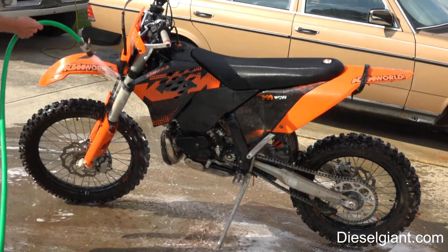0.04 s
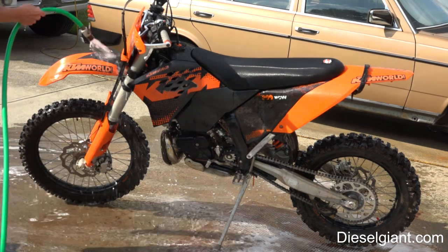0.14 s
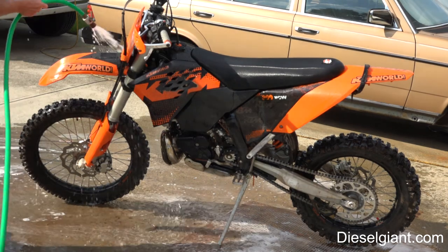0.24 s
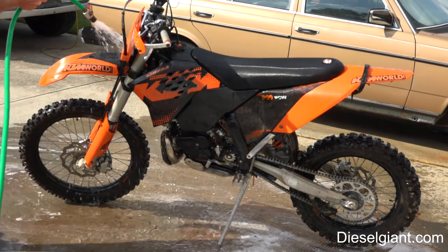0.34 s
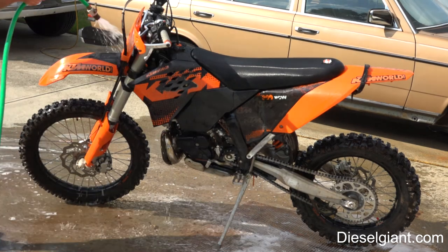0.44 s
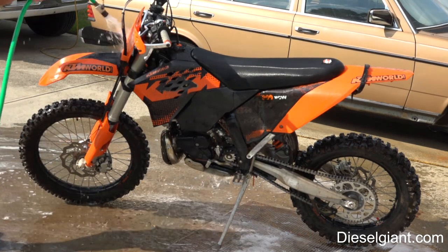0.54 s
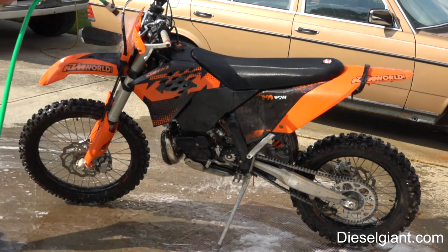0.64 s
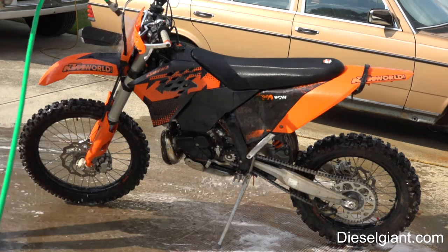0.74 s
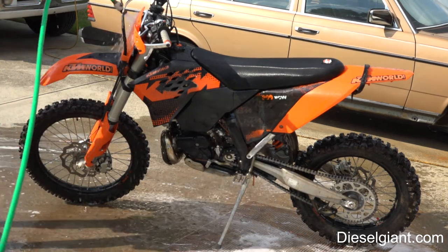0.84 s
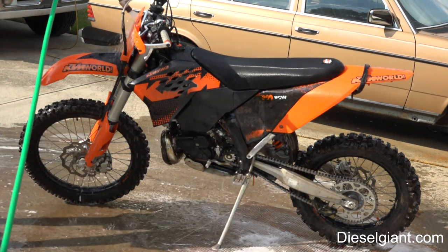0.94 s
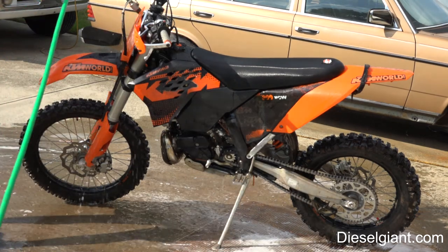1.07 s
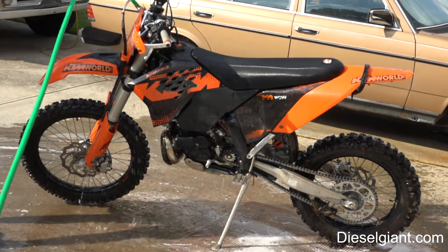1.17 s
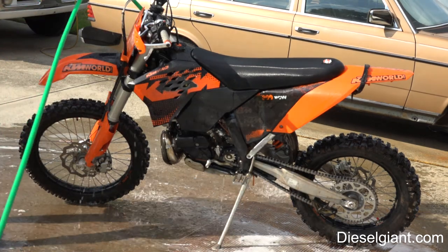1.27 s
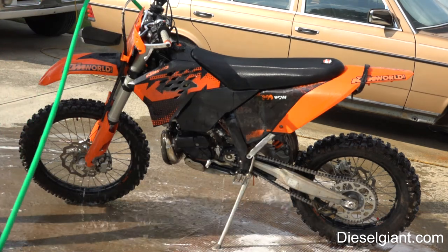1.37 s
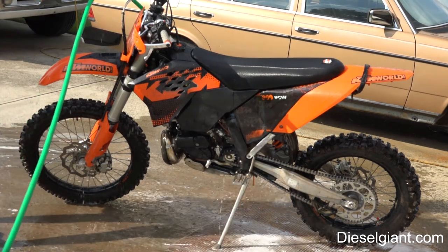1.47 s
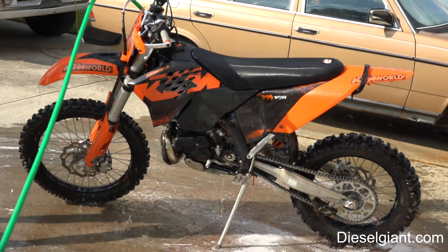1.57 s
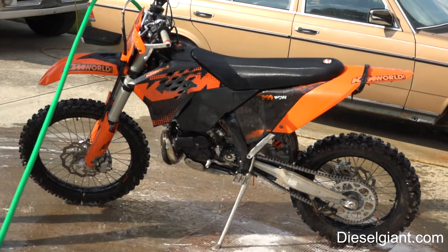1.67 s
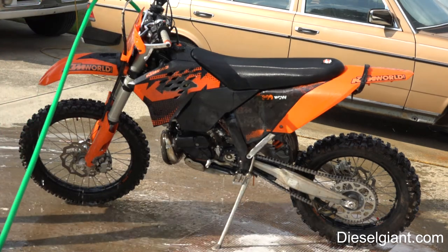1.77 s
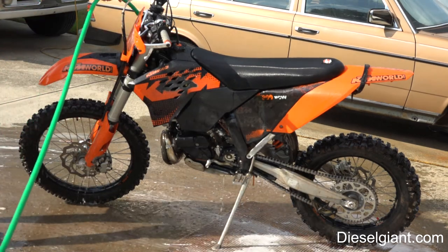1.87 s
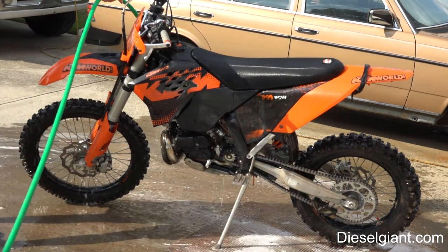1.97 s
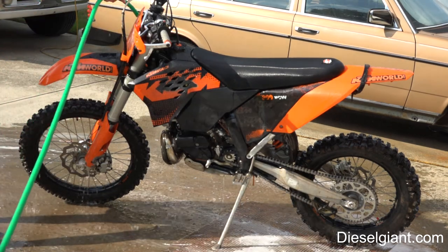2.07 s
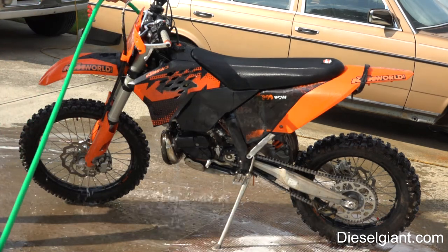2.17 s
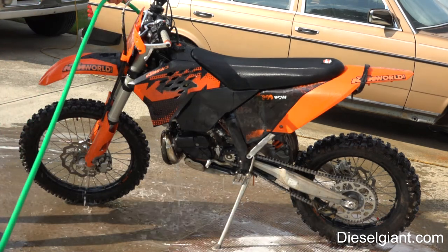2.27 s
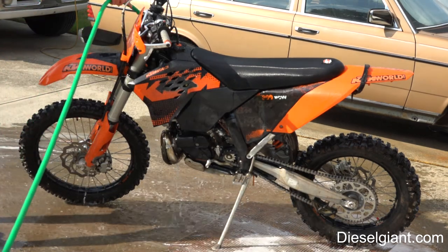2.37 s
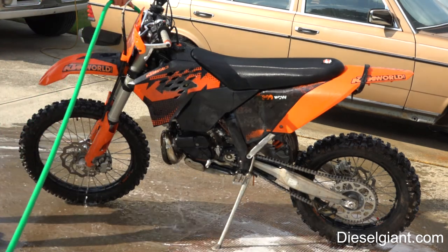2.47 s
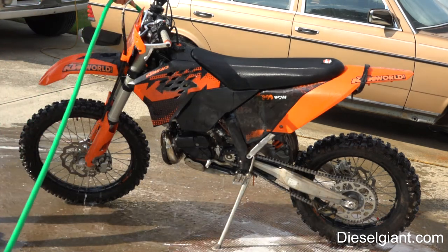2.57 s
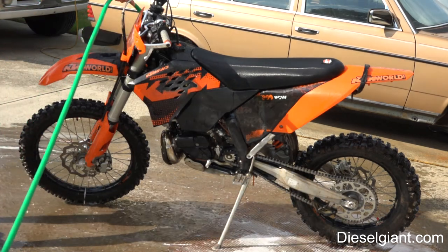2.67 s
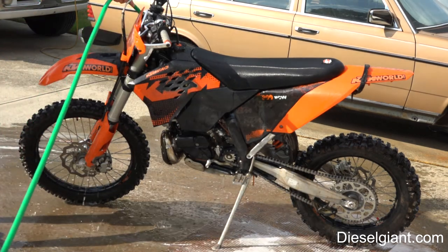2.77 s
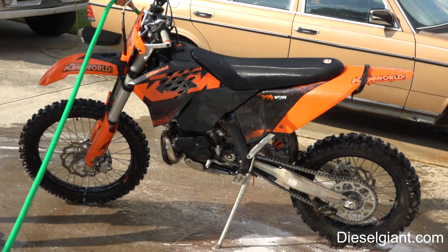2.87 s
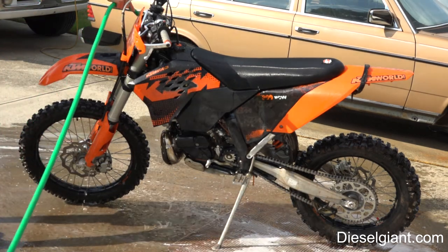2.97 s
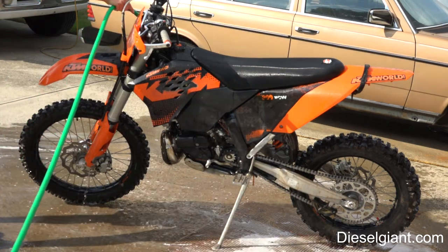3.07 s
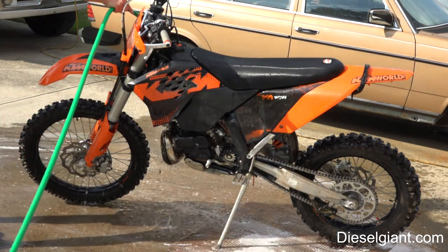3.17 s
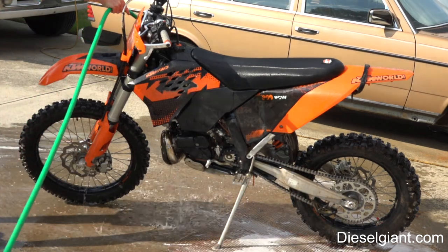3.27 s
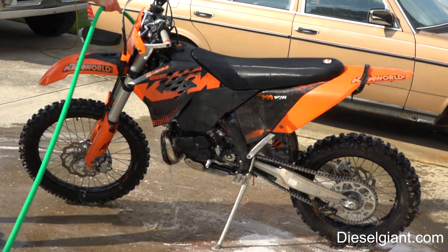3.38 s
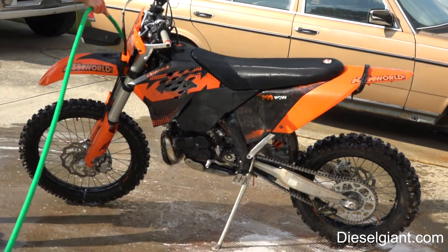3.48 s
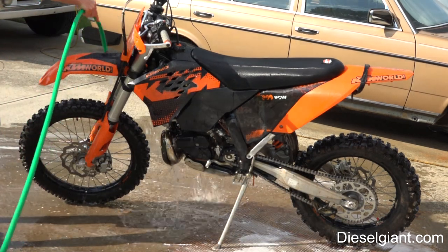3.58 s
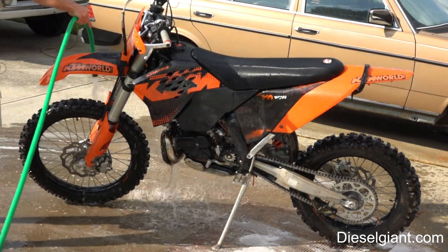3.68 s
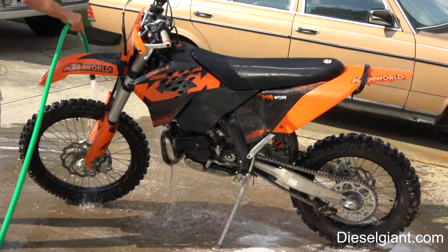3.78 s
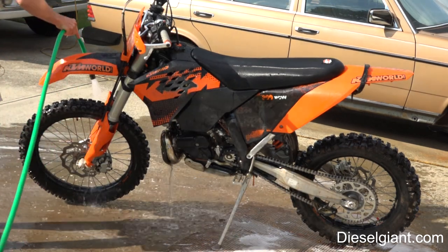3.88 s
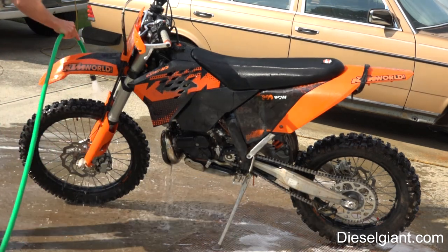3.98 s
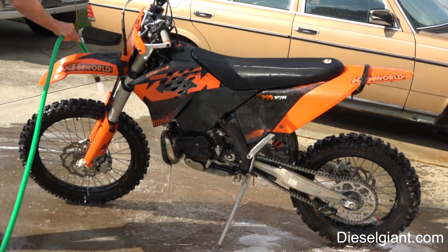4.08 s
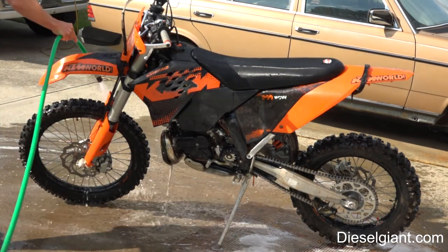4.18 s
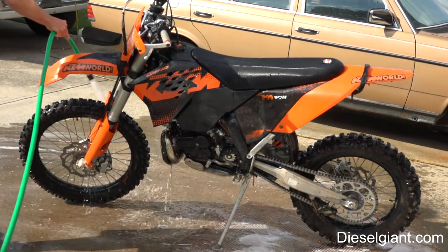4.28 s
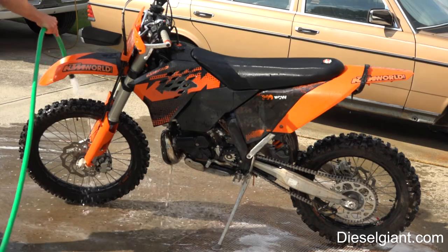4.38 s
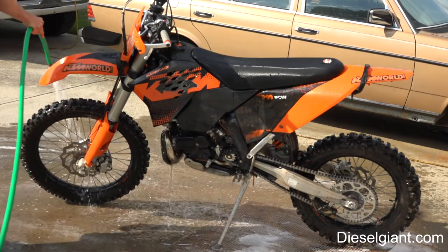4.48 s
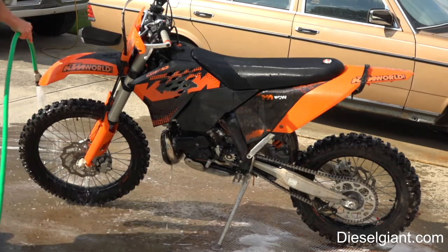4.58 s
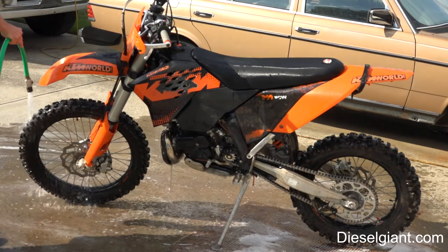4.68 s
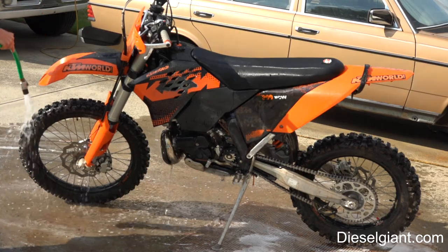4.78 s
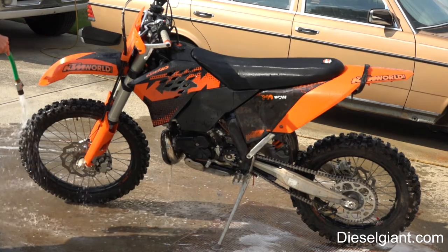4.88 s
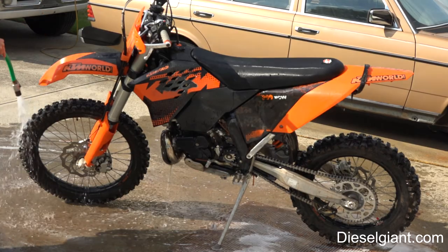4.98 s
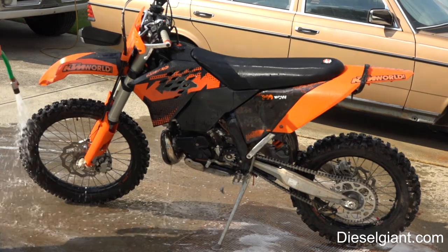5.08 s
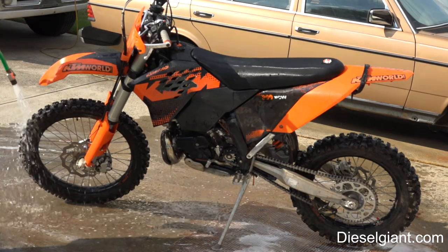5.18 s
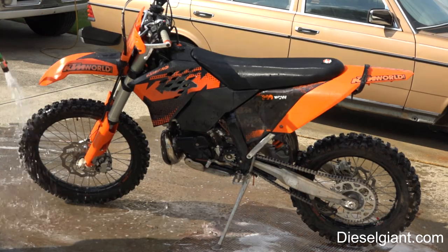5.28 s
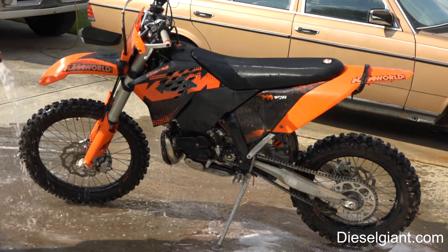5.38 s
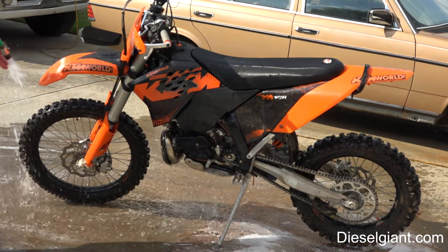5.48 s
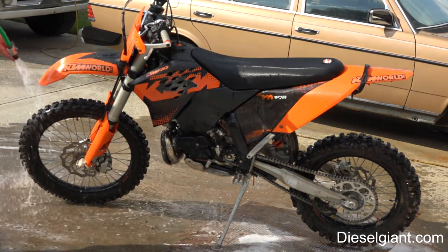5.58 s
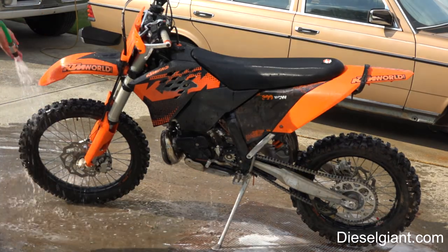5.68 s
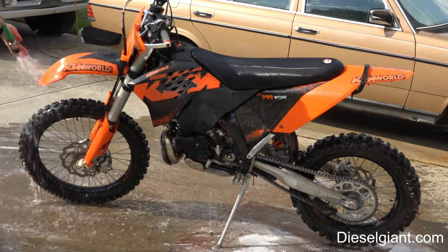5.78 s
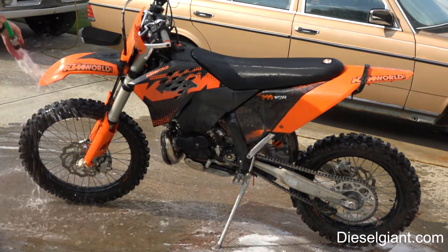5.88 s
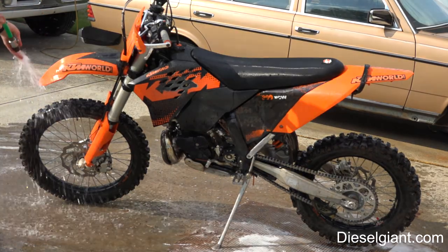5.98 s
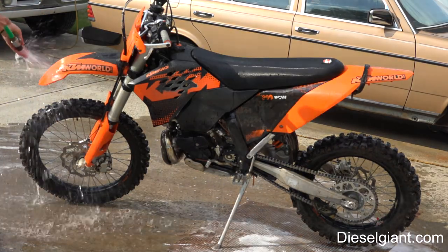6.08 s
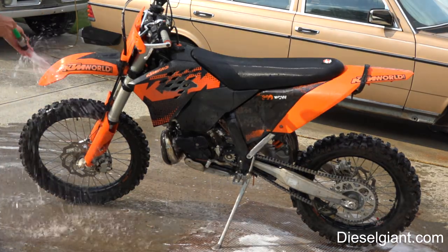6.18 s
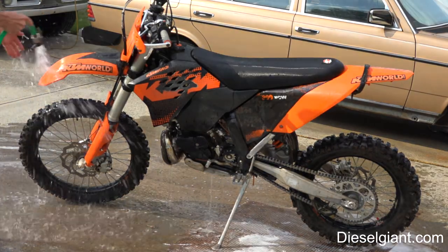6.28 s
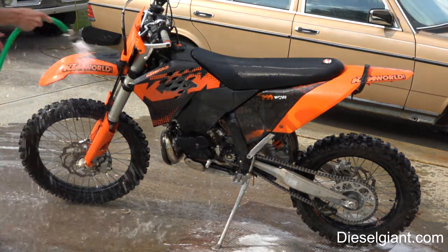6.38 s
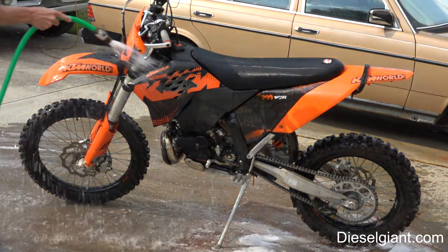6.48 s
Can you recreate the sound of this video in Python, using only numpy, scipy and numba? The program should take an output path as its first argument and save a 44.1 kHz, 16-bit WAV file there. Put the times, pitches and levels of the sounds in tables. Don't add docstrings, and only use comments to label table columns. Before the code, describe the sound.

Water from a garden hose fizzes over a motorbike on wet concrete, a few metres from a small microphone outdoors. From 0 to 1 second the jet is strong and bright, with thick spatter, smacking drops and hollow drumming on plastic, loudest around 0.6 to 0.9. A wind puff bumps the microphone near 1 second as the spray weakens. Until about 3.5 it stays thinner, a flickering hiss with scattered drops, faint singing tones and a hard knock near 2.6. Around 3.6 to 4.3 it bursts and revives, crackling sharply. From 4.6 to 5.3 fine spatter and crisp droplet cracks patter with a short echo; heavier drops and hollow ringing follow from 5.5. The jet surges near 6.2, then eases by 6.5. Quiet bubbling run-off, low wind and barely audible distant hums lie underneath.

```python
import sys
import numpy as np
from scipy import signal
from scipy.fft import rfft, irfft, next_fast_len
from scipy.io import wavfile
from scipy.ndimage import uniform_filter1d, map_coordinates
from numba import njit

SR = 44100
rng = np.random.default_rng(int(sys.argv[2]) if len(sys.argv) > 2 else 0)


def transcribe(signal):
    frames = np.atleast_2d(signal).T
    limited = np.clip(frames, -1, 1)
    pcm = np.round(limited * 32767).astype(np.int16)
    wavfile.write(sys.argv[1], SR, pcm)


def boost(x):
    u = np.asarray(x, float) / 20
    return 10 ** u


N = 288414

# time in seconds, strength in dB, froth over fizz in dB,
# froth pitch in Hz, fizz pitch in Hz.
JET = [(0.0, -25, 2, 3360, 4100), (0.18, -22.5, -1, 3530, 4280), (0.86, -24.5, -4, 2600, 4230),
       (0.95, -23.5, 0.5, 3270, 3800), (1.15, -32, -2, 3240, 4040), (1.38, -27.5, -8, 3190, 4000),
       (1.78, -32.5, 0, 2740, 4200), (1.95, -29.5, -9, 2970, 4130), (2.66, -31.5, -1, 2710, 4240),
       (3.75, -28.5, -3, 3200, 4080), (3.9, -24.5, -9, 3050, 4150), (4.3, -31, 2, 3070, 4360),
       (4.52, -29, -2, 3130, 3740), (4.66, -27, 3, 3310, 3930), (5.99, -24, 2, 2940, 4760),
       (6.17, -18, -3, 2700, 4480), (6.34, -22, 6.5, 3130, 4350), (6.54, -28.5, 0.5, 3110, 4400)]
# start in seconds, length in seconds, fizz gain in dB, froth gain in dB.
SURGES = [(.27, 0.06, -1, 6), (.67, 0.066, 5, -13), (.85, 0.052, 9, 5), (1.31, 0.087, 1.5, 7),
          (1.43, 0.036, 1, 1), (2.38, 0.11, 6.5, 8), (2.76, 0.022, 0, -12), (3.57, 0.046, 8, 8),
          (3.66, 0.036, 5, 13), (3.75, 0.046, 9, 7), (4.08, 0.12, 3, -1), (4.9, 0.42, -4, 0.5),
          (5.5, 0.029, 11, 3), (5.55, 0.081, 4.5, 6.5), (5.79, 0.094, 5, 1), (6.33, 0.075, -3, -5.5),
          (6.41, 0.042, -5, 5)]
# start in seconds, length in seconds,
# spatter gain in dB, mist gain in dB.
SHATTER = [(0, .27, 8, 6), (.6, 0.43, 7, 14), (.27, 0.13, 0, 2), (1.05, .25, -5, 4), (3.1, 0.31, 2.5, 2.5),
           (4.36, 0.13, 7, 3), (1.3, 0.24, 12, 7), (1.55, 0.66, 7, 10), (2.15, 0.11, 6.5, 4.5),
           (2.25, 0.24, 10.5, 9), (2.5, 0.21, 8, 0.5), (2.85, 0.66, 7.5, 2), (3.63, 0.18, 13, 10),
           (3.82, 0.19, 0, 7.5), (4.08, 0.28, 10, 12.5), (4.5, .1, 7.5, 5), (4.59, 0.753, 9.5, 5.5),
           (5.45, 0.6, 1.5, 7), (6.1, .22, 0.5, 4.5), (6.38, 0.24, 10.5, 9.5)]
# frequency in Hz, level in dB.
SPATTER_SPECTRUM = [(3000, -9.5), (5500, 10), (6500, 5.5), (8500, -0.5), (10000, -10.5), (14500, -20)]
# frequency in Hz, level in dB.
MIST_SPECTRUM = [(5500, -8), (9500, 10), (11000, 1), (13000, -4), (15000, -28), (15800, -26)]
# frequency in Hz, level in dB per Hz.
WASH_SPECTRUM = [(120, -44), (200, -19.5), (562, -1), (1510, -7.5), (2370, 1), (2870, 1.5), (4240, 3.5),
                 (6340, -7.5), (7460, -10.5), (9500, -20), (12400, -32), (20900, -120)]
# time in seconds,
# lag in ms, share of the direct sound (below 0 = flipped).
BOUNCE = [(0, 0.3, 0.18), (.35, 0.29, 0.23), (.72, 0.22, 0.091), (.95, 0.25, 0.23), (1.15, 0.27, 0.12),
          (2.0, 0.27, 0.048), (2.15, 0.44, -0.0051), (2.3, 0.31, -0.19), (2.9, 0.33, -0.1),
          (3.55, 0.34, -0.26), (3.66, 0.33, -0.0029), (4.2, 0.24, 0.18), (4.5, .27, 0.018),
          (4.6, 0.26, -0.18), (5.3, 0.3, -0.19), (5.45, 0.39, 0.19), (6.3, 0.36, 0.17), (6.54, .36, 0.1)]
# start in seconds, length in seconds,
# gain in dB, pitch shift in octaves.
PELTS = [(.05, 0.12, 4.5, -0.11), (.35, 0.16, -3.5, 0.014), (.6, 0.23, 18.5, 0.1), (.82, 0.21, 15, .1),
         (1.05, 0.26, 6, 0.12), (1.42, .04, 12, 0.006), (1.55, .65, 3.5, -0.1), (2.2, 1.2, 6.5, .08),
         (3.36, 0.11, 3.5, 0.019), (3.68, 0.16, 2.5, -0.28), (4.1, 0.19, 3.5, -0.056),
         (4.7, 0.62, 1.5, -0.19), (5.55, .4, -0.5, -0.084), (6.0, 0.13, 1.5, -0.12),
         (6.33, 0.29, 7.5, 0.23)]
# start in seconds, length in seconds,
# gain in dB, pitch shift in octaves.
FILLS = [(0, 0.14, 11, 0.023), (.27, 0.12, 7.2, 0.074), (.75, 0.1, 4.5, 0.86), (.45, 0.6, 11, -0.36),
         (.62, .12, 8.7, 0.15), (.86, 0.26, 9.9, 0.33), (1.08, 0.12, 9.9, 0.043), (1.42, 0.033, 24, -0.7),
         (2.25, 0.72, 3.9, -0.31), (3.36, 0.12, 13, 0.37), (3.52, 0.14, 19, 0.08), (3.82, 0.51, 13, 0.24),
         (3.65, 0.2, 8.8, -0.083), (4.35, .2, 9.2, -0.028), (4.7, 0.62, 3.3, -0.24),
         (5.55, 0.26, 17.6, 0.79), (5.75, 0.37, 15, 0.24), (6.1, .22, 22.8, 0.22), (6.34, 0.21, 10, 0.018)]
# frequency in Hz, level in dB.
WIND_SPECTRUM = [(25, -9), (45, -7), (80, 0.5), (150, -1), (250, -9.5), (400, -7.5), (2500, -75)]
# start in seconds, length in seconds, gain in dB.
GUSTS = [
    (.05, 0.081, 9.5),
    (.15, 0.25, 3.6),
    (.6, 0.29, 3.8),
    (.95, 0.13, 18.3),
    (1.08, 0.15, 14.3),
    (1.31, 0.054, 8.7),
    (2.95, .25, 7.1),
    (3.65, .4, 1.9),
    (4.35, 0.29, 5.2),
    (5.5, 0.32, 3.8),
]
# time in seconds, peak in dB, ring in Hz.
DROPS = [(0.0196, -6.5, 3100), (0.0393, -11, 3700), (0.0982, -17, 3180), (0.2094, -13, 4010),
         (0.2344, -4, 3750), (0.2977, -6, 3590), (0.3222, -6, 3130), (0.3536, -7, 4170), (0.4055, -7, 4180),
         (0.424, -6, 4090), (0.5711, -4, 3950), (0.6554, -6, 3180), (0.686, -6, 3980), (0.6958, -1, 4100),
         (0.7384, -0.5, 4320), (0.8634, 1, 4330), (1.071, -8, 3910), (1.316, -13, 3620), (1.3468, -3, 4200),
         (1.4351, -16, 2500), (1.4363, -9, 3800), (1.5384, -11, 3980), (1.6157, -10, 3860),
         (1.8946, -11, 3950), (2.0911, -12, 4470), (2.176, -13, 2850), (2.2278, -7, 4010),
         (2.4229, -13, 4220), (2.7636, -5, 4450), (3.1797, -12, 4240), (3.2121, -13, 4020),
         (3.3777, -15, 4280), (3.5009, -10, 4380), (3.5828, -10, 4420), (3.7623, -11, 4090),
         (3.92, -11, 3980), (4.0852, -12, 2900), (4.127, -9.5, 2920), (4.6072, -6, 4020), (4.661, -9, 3440),
         (4.6858, -10, 3320), (4.9327, -11, 3250), (4.9651, -10, 3020), (5.0594, -18, 3260),
         (5.3727, -11, 2890), (5.484, -8, 3020), (5.5408, -9, 3210), (5.5598, -0.5, 3200),
         (5.599, -10, 2990), (5.6163, -4, 3080), (5.6855, -6, 3150), (5.718, -8, 3200), (5.7828, -11, 3560),
         (5.8411, -10, 2670), (5.8935, -9, 3070), (6.0245, -14, 2620), (6.0721, -14, 2650),
         (6.1918, -6, 2530), (6.4068, -9, 3910), (6.4607, -9, 3110)]
# time in seconds, peak in dB, ring in Hz.
SPITS = [(0.299, 1, 3820), (0.6972, -1, 4040), (0.8255, -3, 3930), (0.8395, -2, 4220), (0.865, -3, 3620),
         (0.972, -4, 3900), (1.3168, -7, 7800), (1.368, -7, 4000), (1.4425, -8, 3900), (1.4472, -3, 4400),
         (2.029, -11, 4300), (2.7645, -3.5, 3680), (2.774, -3, 4260), (2.859, -9, 4530), (3.763, -5, 4300),
         (4.086, -10, 3300), (4.621, -8, 4200), (4.688, -7, 3770), (4.889, -2, 5000), (5.127, -5, 3600),
         (5.8425, -1, 5000), (6.194, -6, 3000), (6.301, -7, 7000), (6.332, -10, 6500), (6.42, -4, 4000)]
# time in seconds, peak in dB, ring in Hz.
KNOCKS = [
    (0.636, -10, 795),
    (0.659, -9, 735),
    (1.429, -8.5, 1210),
    (1.434, -11, 715),
    (2.488, -34, 1500),
    (2.582, -6, 1526),
    (2.701, -29, 1535),
    (3.596, -8, 1720),
    (6.408, -14, 754),
]
# time in seconds, peak in dB, ring in Hz.
CRACKS = [(0.0538, -12, 5810), (0.0628, -8, 5310), (0.0992, -12, 5460), (0.1401, -11, 6220),
          (0.2319, -12, 5680), (0.6494, -12, 5460), (0.8385, -13, 5400), (0.968, -13, 7340),
          (1.1069, -12, 5320), (1.266, -16, 5200), (1.285, -15, 6290), (1.3159, -7, 5350),
          (1.3473, -8, 5450), (1.3813, -13, 6080), (1.4316, -17, 5850), (1.4466, -9, 5960),
          (2.2258, -21, 5410), (2.5905, -21, 5330), (2.9682, -17, 5440), (3.1795, -19, 5450),
          (3.6636, -16, 5300), (3.6701, -13, 5750), (3.7359, -12, 6120), (3.7628, -6, 5840),
          (3.8232, -20, 5490), (4.0741, -14, 6360), (4.309, -13, 5200), (4.3301, -12.5, 6680),
          (4.5116, -12, 6440), (4.5865, -13, 5750), (4.6223, -11, 5440), (4.6876, -7, 5430),
          (4.7511, -7, 5780), (4.8379, -15, 5240), (4.8896, -13, 6000), (4.9282, -19, 5820),
          (4.9656, -14, 5380), (5.027, -20, 5200), (5.028, -11, 5540), (5.0848, -16, 5350),
          (5.126, -7, 5400), (5.1765, -17, 5600), (5.3273, -16, 5200), (5.3277, -16, 5450),
          (5.4834, -11, 5610), (5.5403, -17, 5380), (5.5837, -14, 5310), (5.6186, -17, 5210),
          (5.7763, -18, 5240), (5.841, -11, 5370), (5.8935, -17, 5290), (5.9494, -18, 5360),
          (6.0806, -13, 5610), (6.3, -8, 5270), (6.32, -12, 5240), (6.3315, -7, 5280), (6.4168, -20, 5950),
          (6.4173, -13, 5780), (6.4368, -16, 5540), (6.4607, -14, 5470)]
# start in seconds, end in seconds,
# start pitch in Hz, end pitch in Hz, level in dB.
STREAKS = [(.03, .2, 3300, 3100, -33), (.22, .36, 4420, 4280, -27.5), (.55, .68, 2880, 3200, -36),
           (.72, .86, 4400, 4700, -29), (.86, 1.03, 4280, 3710, -20), (1.0, 1.16, 3970, 3900, -30.5),
           (1.1, 1.22, 3300, 3170, -38), (3.3, 3.5, 4460, 4120, -34), (3.56, 3.64, 4500, 4230, -33),
           (3.6, 3.72, 3500, 3200, -29.5), (3.65, 3.71, 6000, 6350, -29.5), (3.74, 3.8, 5600, 5400, -34),
           (3.88, 4.02, 4220, 4030, -31.5), (4.08, 4.36, 3450, 3390, -34), (4.1, 4.26, 4690, 5100, -35),
           (4.4, 4.52, 3700, 3600, -35), (4.6, 4.95, 5720, 5770, -31.5), (4.9, 5.36, 5400, 5300, -33),
           (4.64, 5.02, 3550, 3080, -29.5), (5.05, 5.33, 3530, 3050, -31), (5.36, 5.46, 2690, 2670, -28.5),
           (5.36, 5.56, 3070, 3050, -30), (5.4, 5.58, 4400, 4700, -32.5), (2.95, 3.3, 4130, 4260, -39)]
# start in seconds, end in seconds,
# start pitch in Hz, end pitch in Hz, level in dB.
SINGING = [(.27, 0.39, 2060, 2000, -32), (0.22, .38, 3600, 3300, -24.5), (0.39, .62, 4100, 4410, -28),
           (.72, .92, 2400, 2700, -29), (.62, .89, 714, 653, -31), (1.52, 1.76, 2850, 2830, -32.5),
           (1.7, 1.97, 2830, 2880, -32), (2.3, 2.5, 1600, 1570, -38.5), (2.48, 2.87, 1570, 1550, -36.5),
           (2.7, 2.8, 2200, 3000, -40), (3.38, 3.64, 2400, 1750, -37.5), (4, 4.35, 3050, 3000, -34.5),
           (2.5, 3.5, 2600, 2800, -41), (5.9, 6.2, 3700, 3600, -29), (3.85, 4.3, 2000, 2280, -37.5),
           (5.55, 5.95, 2300, 2350, -29.5), (6.05, 6.29, 2320, 2300, -27.5), (0.87, 1.2, 133, 260, -45),
           (6.38, 6.5, 745, 790, -39)]
# pitch in Hz, level in dB, start in seconds, end in seconds.
HUM = [
    (178, -57, 1.35, 2.5),
    (178, -56, 5.3, 6.25),
    (242.6, -56.5, 3.23, 4.7),
    (411, -50, 3.65, 4.3),
    (343, -59, 3, 4.8),
]
# start in seconds, end in seconds, notch in Hz, depth from 0 to 1.
SHADOWS = [(0, .25, 2300, 0.33), (.35, .6, 2550, 0), (2.447, 2.753, 3460, 0.42), (3.65, 3.95, 2500, 0.22),
           (3.8, 4.6, 1250, 0.33), (4.15, 4.4, 1790, 0.23), (4.75, 5.3, 2230, 0.34),
           (4.75, 5.3, 4600, 0.08), (5.347, 5.722, 4020, 0.37), (5.348, 5.748, 1570, 0.3),
           (5.75, 6.24, 4150, 0.17), (5.8, 6.05, 1400, 0.16), (1.55, 1.9, 3400, 0.26),
           (1.044, 1.3, 1500, 0)]
# start in seconds, length in seconds, share.
GROUND = [
    (0, 1.25, 0.054),
    (1.5, 0.47, 0.076),
    (2.25, 0.82, 0.15),
    (3.95, .4, 0.1),
    (5.3, 0.14, 0.062),
]
# start in seconds, length in seconds, share.
WALL = [
    (4.75, 0.5, 0.2),
]


def curves(table):
    s, *columns = np.transpose(table)
    return [np.interp(np.arange(N) / SR, s, c) for c in columns]


def spells(table, attack_s, release_s):
    t = np.arange(N) / SR
    start, length, *values = np.transpose(table)
    shape = []
    for a, d in zip(start, length):
        rise = (t - a) / attack_s
        fall = (a + d - t) / release_s
        shape.append(np.clip(np.minimum(rise, fall) + .5, 0, 1))
    return np.array(values) @ np.array(shape)


def walk(rate):
    k = int(SR / rate)
    held = np.repeat(rng.standard_normal(N // k + 1), k)
    return 1.13 * uniform_filter1d(held, k)[:N]


def unit(x):
    return x / np.sqrt(np.mean(x ** 2))


def colour(x, points):
    hz, db = np.transpose(points)
    size = next_fast_len(N)
    f = np.maximum(np.arange(size // 2 + 1) * SR / size, 1)
    gain = boost(np.interp(np.log(f), np.log(hz), db))
    return unit(irfft(rfft(x, size) * gain, size)[:N])


@njit
def rings(start, hz, cycles, glide, size, length):
    out = np.zeros(length)
    for g in range(len(start)):
        w = 2 * np.pi * hz[g] / SR
        fade = np.exp(-hz[g] / (cycles[g] * SR))
        steps = min(int(5 * cycles[g] * SR / hz[g]), length - start[g])
        a, rise, phase = size[g], 1., 0.
        for i in range(steps):
            out[start[g] + i] += a * (1 - rise) * np.sin(phase)
            phase += w * (1 + glide * i / steps)
            a *= fade
            rise *= 1 - .4 * w
    return out


def sizes(chance, scatter_db):
    excess = np.minimum(-np.log(1 - chance[1]), 5.5)
    return boost(scatter_db * excess) * np.sign(chance[2] - .5)


def shower(hz, count, spread, cycles, glide, scatter_db):
    chance = rng.random((count, 3)).T
    bell = rng.standard_normal((count, 2)).T
    start = (chance[0] * (N - 1)).astype(np.int64)
    pitch = np.clip(hz[start] * np.exp(spread * bell[0]), 50, SR / 3)
    ring_cycles = cycles * np.exp(0.23 * bell[1])
    return unit(rings(start, pitch, ring_cycles, glide, sizes(chance, scatter_db), N))


def ticks(count, scatter_db):
    chance = rng.random((count, 3)).T
    chance[1] *= .985
    out = np.zeros(N)
    np.add.at(out, (chance[0] * N).astype(int), sizes(chance, scatter_db))
    return unit(out)


def bounced(x):
    near_ms, near = curves(BOUNCE)
    far_ms, far = 0.392, 0.037
    near_echo, far_echo = [map_coordinates(x, [np.arange(N) - ms * SR / 1000], order=3, mode="nearest")
                           for ms in (near_ms, far_ms)]
    return (x + near * near_echo + far * far_echo) / np.sqrt(1 + near ** 2 + far ** 2)


def jet():
    jet_db, froth_over_db, froth_hz, fizz_hz = curves(JET)
    fizz_surge_db, froth_surge_db = spells(SURGES, 0.084, 0.048)
    shatter_db, haze_db = spells(SHATTER, 0.03, 0.06)
    fizz_db = jet_db + fizz_surge_db + 1.5
    froth_db = jet_db + froth_surge_db + 1.4 + froth_over_db
    spatter_db = jet_db - 14 + shatter_db
    mist_db = jet_db - 26.5 + haze_db
    sputter = 0.31 * walk(45) + 1.13 * walk(120)

    froth = shower(froth_hz, count=14000, spread=.075, cycles=4.4, glide=.05, scatter_db=2.0)
    fizz = shower(fizz_hz, count=20000, spread=.06, cycles=4.2, glide=.02, scatter_db=2.5)
    droplets = ticks(count=20000, scatter_db=5.0)
    spatter = colour(droplets + 0.27 * rng.standard_normal(N), SPATTER_SPECTRUM)
    mist = colour(droplets + 0.89 * rng.standard_normal(N), MIST_SPECTRUM)
    wash = colour(rng.standard_normal(N), WASH_SPECTRUM)

    strength_db = 0.25 * (np.maximum(froth_db, fizz_db) + 30.5) + 0.27 * spells(PELTS, 0.033, 0.022)[0]
    spray = wash * boost(-30.5 + strength_db + 1.0 * sputter)
    spray += fizz * boost(fizz_db - 3.5 + 0.7 * sputter + 1.97 * walk(60))
    spray += spatter * boost(spatter_db + 1.47 * sputter + 2.2 * walk(70))
    spray += mist * boost(mist_db + 1.1 * sputter + 2.6 * walk(30))
    return bounced(spray) + froth * boost(froth_db - 3.0 + 1.13 * sputter + 1.4 * walk(40))


def hollow():
    fill_db, fill_octaves = spells(FILLS, 0.066, 0.037)
    hz = 1880 * 2 ** fill_octaves
    ringing = shower(hz, count=6000, spread=0.041, cycles=1.3, glide=.02, scatter_db=3.0)
    return ringing * boost(-36 + fill_db - 15.0 + 2.6 * walk(24.74))


def panels():
    pelt_db, pelt_octaves = spells(PELTS, 0.057, 0.11)
    hz = 616.4 * 2 ** pelt_octaves
    drumming = shower(hz, count=5000, spread=0.1, cycles=1.08, glide=0.023, scatter_db=3.0)
    drumming += 0.5 * shower(0.633 * hz, count=5000, spread=0.264, cycles=1.96, glide=0.012, scatter_db=1.0)
    return drumming * boost(-38 + pelt_db - 8.0 + 0.3 * walk(25))


def runoff():
    hz = np.full(N, 1500.)
    bubbles = shower(hz, count=1500, spread=.35, cycles=7., glide=.04, scatter_db=1.6)
    return bubbles * boost(-42.5 + 1.4 * walk(4))


def wind():
    rumble = colour(rng.standard_normal(N), WIND_SPECTRUM)
    return rumble * boost(-53 + spells(GUSTS, 0.091, 0.07)[0])


def smack(table, cycles, gain_db, pitch):
    s, db, hz = np.transpose(table)
    start = ((s + .0006) * SR).astype(np.int64)
    return rings(start, pitch * hz, np.full(len(s), cycles), 0.055, boost(db + gain_db), N)


def big_drops():
    return smack(DROPS, 3.54, 0.95, 0.98) + smack(SPITS, 2.3, 1.5, 0.99) + smack(KNOCKS, 1.4, -1.1, 1.0)


def cracks():
    return smack(CRACKS, 4.3, 1.6, 0.98) + smack(CRACKS, 2.2, -5.0, 1.45)


def singing(table, cycles, spread, patchy_db):
    out = 0
    for a, b, start_hz, end_hz, db in table:
        span = slice(int(a * SR), int(b * SR))
        chance = rng.random((600, 3)).T
        start = (SR * (a + (b - a) * chance[0])).astype(np.int64)
        hz = start_hz + (end_hz - start_hz) * chance[0]
        hz *= 1 + spread * rng.standard_normal(len(hz))
        swell = np.sin(np.pi * chance[0]) ** 0.29
        tone = rings(start, hz, np.full(len(hz), 1. * cycles), 0.0056, swell * sizes(chance, 3.3), N)
        out = out + boost(db + patchy_db * walk(30)) * tone / np.std(tone[span])
    return out


def far_hum():
    t = np.arange(N) / SR
    hum = 0
    for hz, db, a, b in HUM:
        fade = np.clip(8 * np.minimum(t - a, b - t), 0, 1)
        hum = hum + boost(db + 0.72 * walk(2.7)) * np.sin(2 * np.pi * hz * t) * fade
    return np.sqrt(2) * hum


def shadowed(x):
    t = np.arange(N) / SR
    for a, b, notch_hz, depth in SHADOWS:
        band = signal.filtfilt(*signal.iirpeak(notch_hz, 3.5, fs=SR), x)
        present = np.clip(np.minimum(t - a, b - t) / 0.055 + .5, 0, 1)
        x = x - np.clip(depth, 0, 1) * present * band
    return x


def echoed(water):
    ground = spells(GROUND, 0.14, 0.11)[0] * np.roll(water, int(0.001404 * SR))
    tyre = spells(WALL, .08, .08)[0] * np.roll(water, int(0.004 * SR))
    water = water + ground + tyre
    return water + 0.14 * np.roll(water, int(.0094 * SR))


def scene():
    impacts = signal.sosfilt(signal.butter(2, 9000, fs=SR, output="sos"), big_drops() + cracks())
    water = jet() + hollow() + panels() + impacts
    water = signal.sosfilt(signal.butter(3, 190, "high", fs=SR, output="sos"), water) + runoff()
    water = shadowed(water)
    water = water + singing(STREAKS, 9.4, 0.032, 2.4) + singing(SINGING, 10.8, .027, 1.55)
    return (echoed(water) + wind() + far_hum())[None]


def low_pass(x):
    return signal.sosfilt(signal.butter(12, 15700, fs=SR, output="sos"), x)


def record(dry):
    hiss = boost(-53) * rng.standard_normal(dry.shape)
    mix = signal.sosfilt(signal.ellip(10, .2, 60, 15750, fs=SR, output="sos"), dry + hiss)
    mix = mix / (1 + (mix / .88) ** 8) ** (1 / 8)
    return low_pass(mix)


dry = scene()
out = record(dry)
transcribe(out)
```